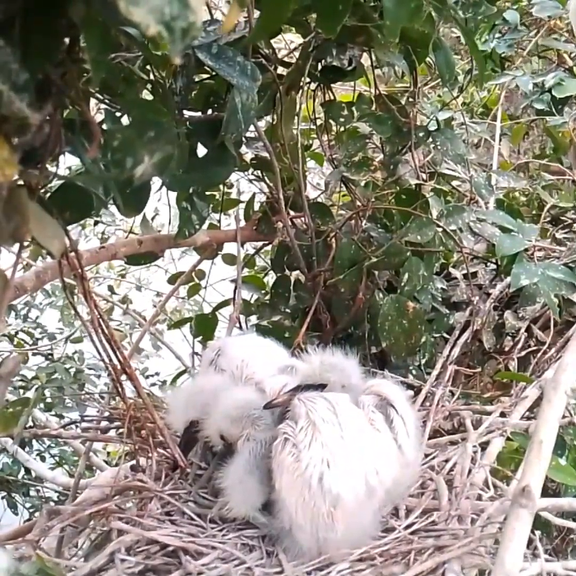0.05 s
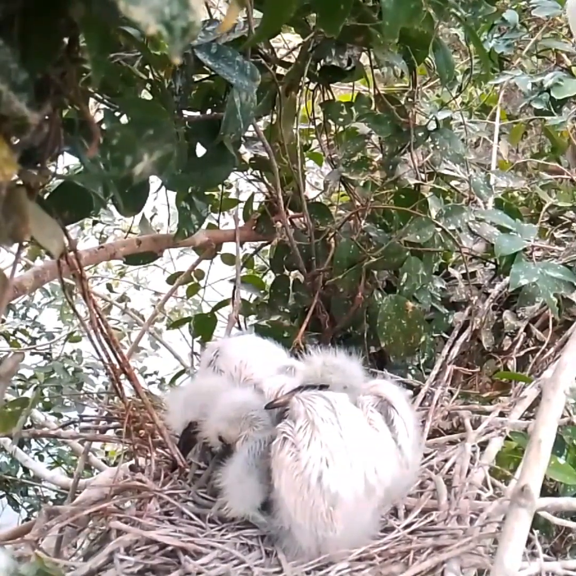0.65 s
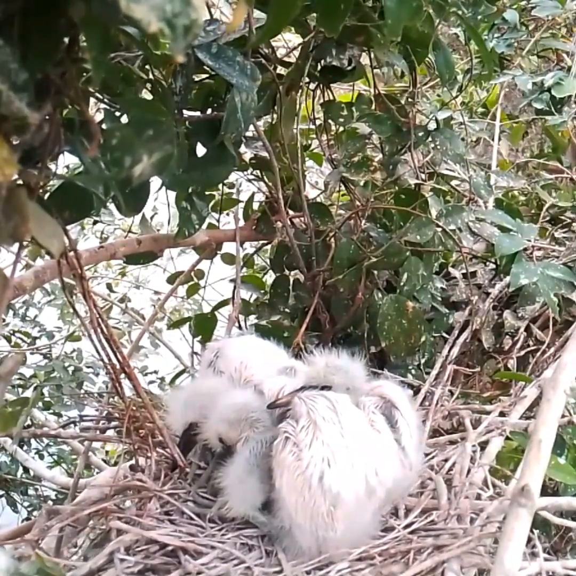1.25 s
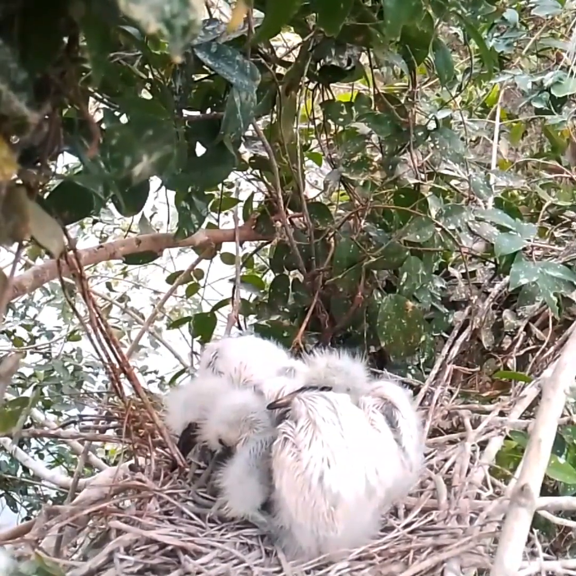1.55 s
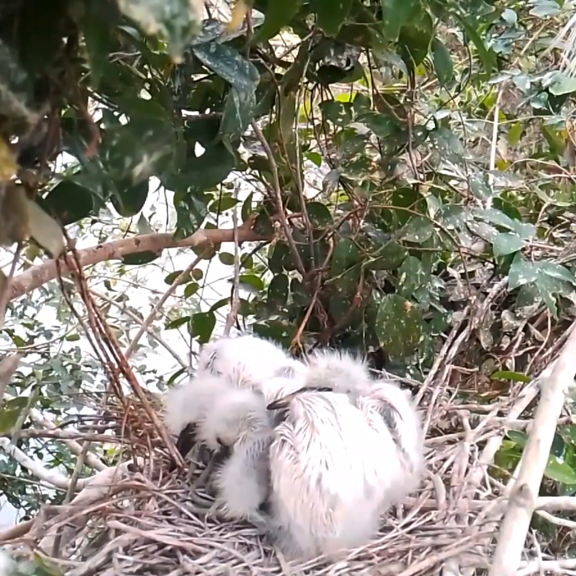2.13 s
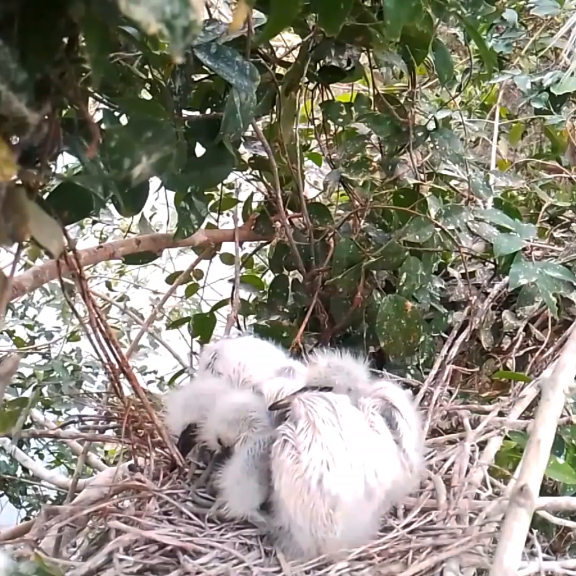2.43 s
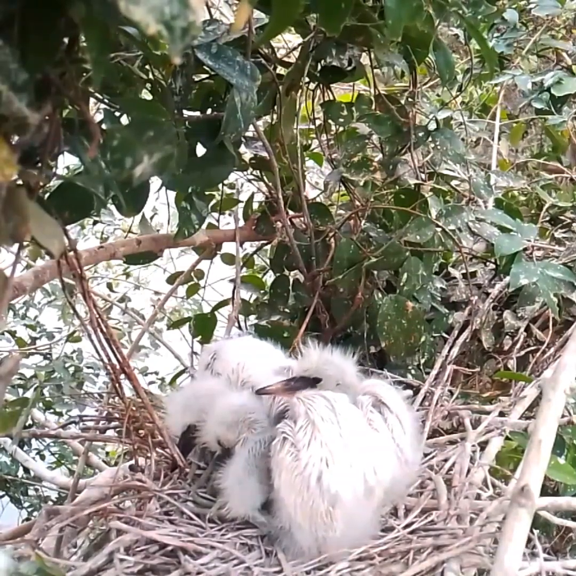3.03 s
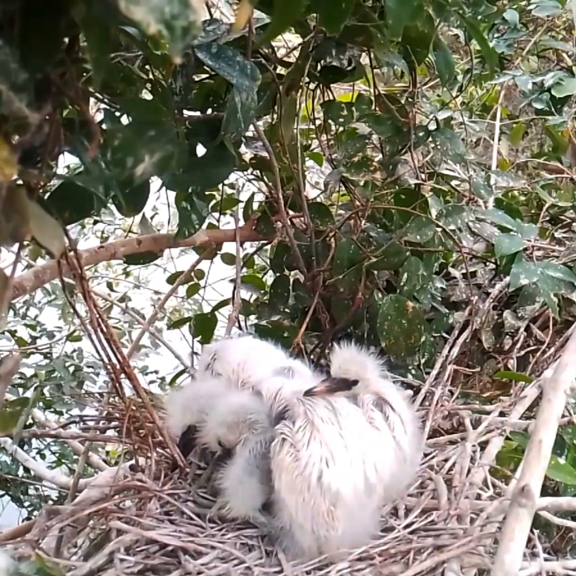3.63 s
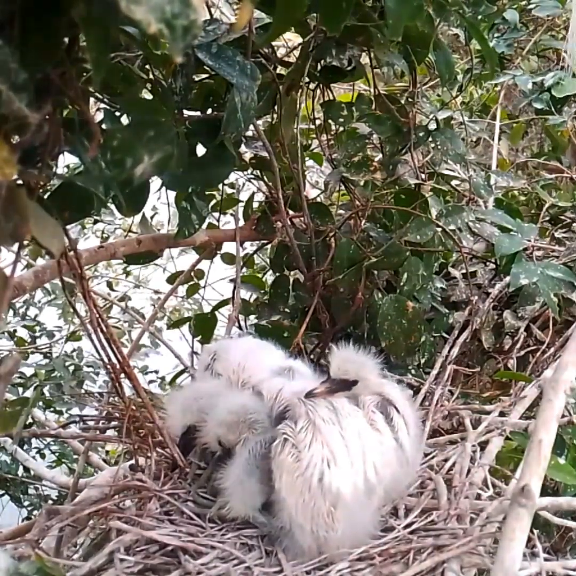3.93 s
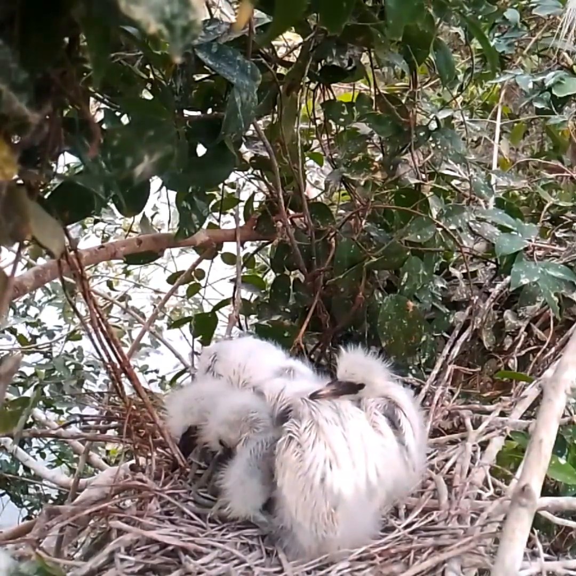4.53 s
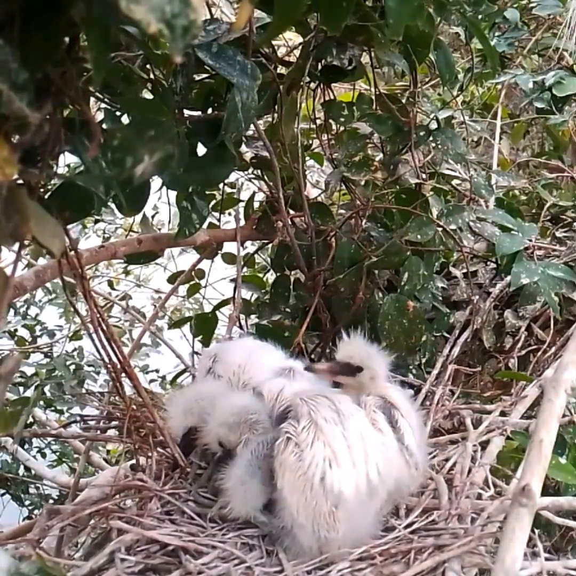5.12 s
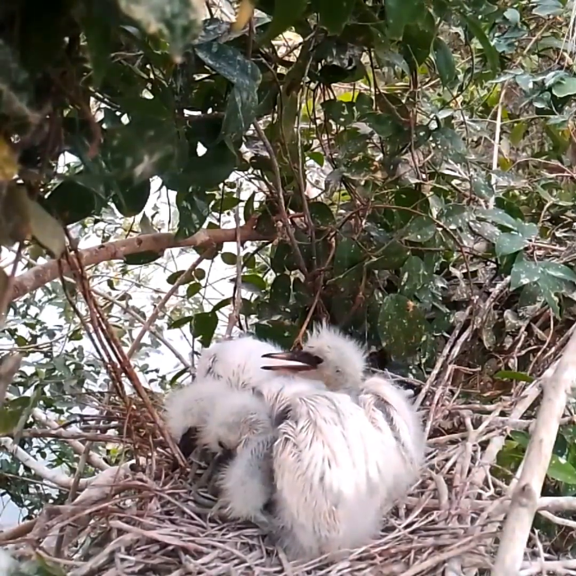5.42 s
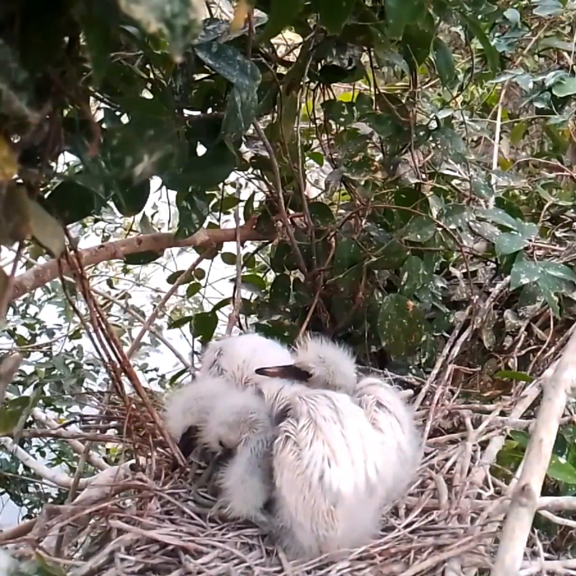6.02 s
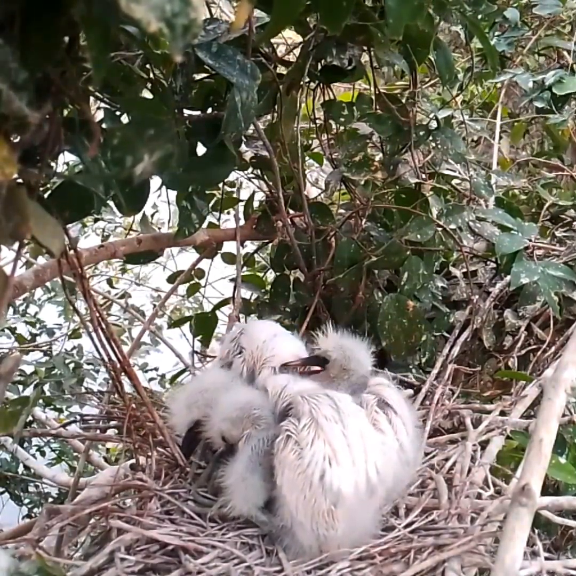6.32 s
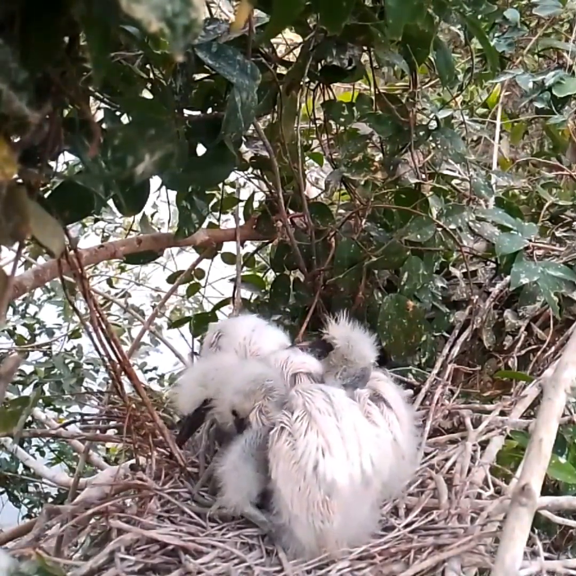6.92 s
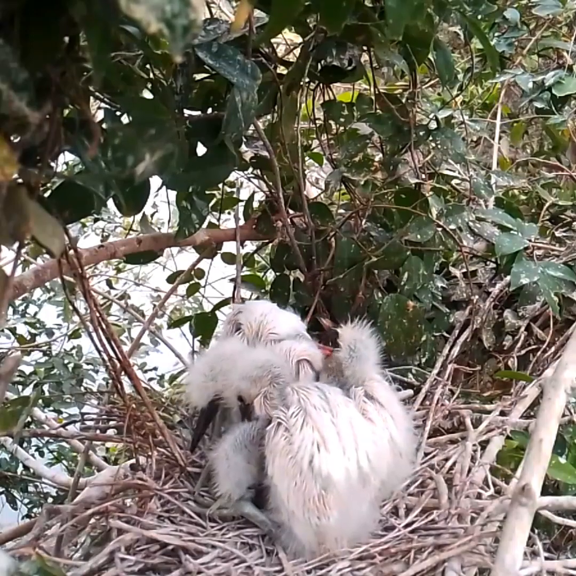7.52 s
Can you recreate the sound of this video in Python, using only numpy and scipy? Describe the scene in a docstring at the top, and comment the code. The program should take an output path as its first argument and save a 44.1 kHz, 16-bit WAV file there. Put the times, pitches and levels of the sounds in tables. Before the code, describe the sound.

Young birds chatter in dry clicks, then beg with hoarse, hissy rasps and wheezes over the faint sizzle of a distant bird colony.

```python
"""Egret chicks call from a stick nest, deep in the leaves of a breeding colony.
They chatter in dry, hissy "keks", then one begs in hoarse rasps, a little over two a second, among
squawks and wheezes. Loose skin in the voice box chops the breath into puffs, which ring in the throat.
Neighbours croak, squeal and peep over the steady sizzle of far nests and a faint rumble of open air.
The leaves scatter every sound, and two small microphone openings colour the treble differently."""
import sys
import numpy as np
from scipy import signal
from scipy.fft import rfft, irfft, next_fast_len
from scipy.io import wavfile
from scipy.ndimage import uniform_filter1d

SR = 44100
rng = np.random.default_rng(int(sys.argv[2]) if len(sys.argv) > 2 else 0)


def unload_audio(sound):
    """Save the sound as a 16-bit wav file, at the path given as the first command line argument."""
    columns = np.transpose(np.atleast_2d(sound))
    # keep every value between -1 and 1, then stretch to whole-number steps
    steps = np.round(np.clip(columns, -1, 1) * 32767)
    wavfile.write(sys.argv[1], SR, steps.astype(np.int16))


N = 342216
TIME = np.arange(N) / SR
CALL_SIZE = 3 * 2 ** 13   # samples set aside to shape one call
CALL_HZ = np.fft.rfftfreq(CALL_SIZE, 1 / SR)
NEST_LAG_MS, COLONY_LAG_MS = 0.32, 0.498   # the left side hears this much later
CUTOFF_HZ = 15800

# how busy the colony is over time: time_s, level_db
COLONY_BUSTLE = [(0, -62), (.1, -68.5), (.16, -67.5), (.23, -64), (.32, -63), (.46, -67), (.52, -65),
                 (.62, -65), (.95, -61.5), (1.06, -64.5), (1.17, -62), (1.25, -65), (1.35, -63),
                 (1.53, -64), (1.94, -64.5), (2.53, -60), (2.79, -61.5), (3.41, -61), (3.95, -69),
                 (4.06, -73.5), (4.52, -57.5), (4.84, -58), (5.81, -61.5), (6.09, -64), (6.33, -69.5),
                 (6.45, -62.5), (7.05, -65), (7.22, -58), (7.76, -51)]
# tone colour of the hiss in rasps and twig ticks: pitch_hz, level_db
FULL_HISS = [(100, -56), (400, -20), (900, -21.5), (1550, -15), (2400, -4.5), (3500, -1.5), (5000, -5.5),
             (8000, 2.5), (11000, 3), (15000, -11)]
# tone colour of the thinner hiss in squawks and wheezes: pitch_hz, level_db
BEGGING_HISS = [(400, -25), (1200, -19.5), (2200, -17), (2900, -7.5), (3600, -5.5), (5000, -4.5),
                (6200, -2.5), (8000, 2), (11000, 2), (15000, -16.5)]


def from_db(db):
    """Turn decibels into a gain, the number a sound is multiplied by."""
    return 10 ** (np.asarray(db) / 20)


def rms_one(x):
    """Scale to an average power of one."""
    return x / np.sqrt(np.mean(x ** 2) + 1e-20)


def at_hz(points, hz):
    """Read the gain at any pitch from a table of pitch_hz, level_db."""
    pitches, db = np.transpose(points)
    return from_db(np.interp(np.log(hz + 1), np.log(pitches), db))


def colour(x, points):
    """Make each pitch louder or softer by a table of pitch_hz, level_db."""
    size = next_fast_len(N + 4096)
    return irfft(rfft(x, size) * at_hz(points, np.fft.rfftfreq(size, 1 / SR)), size)[..., :N]


def drift(rate):
    """A smooth random wobble of typical size one, turning about `rate` times a second."""
    step, warm_up = 40, 2000
    keep = np.exp(-2 * np.pi * step * rate / SR)
    noise = rng.standard_normal(N // step + warm_up + 2)
    slow = signal.lfilter([1], [1, -2 * keep, keep * keep], noise)[warm_up:]
    return np.interp(np.arange(N) / step, np.arange(len(slow)), rms_one(slow))


def voice_box(flap_hz, jitter, rough_db):
    """Loose skin flaps unevenly, letting out puffs of hiss; the rows go ahead, left and right."""
    flaps = np.cumsum(flap_hz * np.exp(jitter * drift(60))) / SR
    puffs = from_db(rough_db * (drift(50) - 2 * (flaps % 1)))
    return rms_one(puffs * rng.standard_normal((3, N)))


def wavering_tone(hz, waver):
    """Tight skin in the voice box sings one unsteady tone, sent alike ahead, left and right."""
    cycles = np.cumsum(hz * (1 + waver * drift(66))) / SR
    return np.broadcast_to(rms_one(np.sin(2 * np.pi * cycles)), (3, N))


def resonance(centre_hz, width_hz):
    """A hollow space rings: the gain is one at its own pitch and falls away on both sides."""
    return 1 / (1 + (2 * (CALL_HZ - centre_hz) / width_hz) ** 2)


def mouth_shape(ripple_db=3, spacing_hz=420):
    """No two calls have the same mouth shape, so each hiss gets its own random peaks and dips."""
    pitches = np.arange(0, SR / 2, spacing_hz)
    return from_db(ripple_db * np.interp(CALL_HZ, pitches, rng.standard_normal(len(pitches))))


def throat_and_bill(peak_s, throat, hiss_colour, hiss_db, voice_db, left_db, bill_width_hz, treble_db):
    """Gain at each pitch for a near chick: its throat rings and its open bill shapes a hiss."""
    # the pitch the bill boosts, which moves with how far it opens: time_s, pitch_hz
    bill_pitches = [(0, 5360), (1.7, 6900), (2.4, 5030), (5.05, 5630), (5.2, 11600), (5.37, 12400),
                    (5.45, 5370), (5.8, 8160), (6.3, 7050), (6.6, 5200), (6.75, 8100), (7.0, 4410)]
    bill_hz = np.interp(peak_s, *np.transpose(bill_pitches))
    hiss = mouth_shape() * at_hz(hiss_colour, CALL_HZ) * (CALL_HZ < CUTOFF_HZ)
    hiss = from_db(hiss_db) * rms_one(hiss * (1 + resonance(bill_hz, bill_width_hz)))
    hiss *= from_db(treble_db / (1 + (9650 / (CALL_HZ + 1)) ** 10))   # only the highest treble
    voice = [from_db(voice_db + db) * rms_one(resonance(hz, width)) for hz, width, db in throat]
    no_bass = 1 / np.hypot(1, (300 / (CALL_HZ + 1)) ** 3)   # a small bird cannot send out low notes
    facing = from_db([[0], [left_db / 2], [-left_db / 2]])   # left_db is left minus right
    return facing * no_bass * np.linalg.norm(voice + [hiss], axis=0)


def add_call(out, source, peak_s, rise_s, fade_s, gain, glide=0, sag=0):
    """Add a call that swells and fades; its pitch slides (glide, octaves a second) and sags when weak."""
    start = max(0, int(peak_s * SR) - CALL_SIZE // 2)
    shaped = irfft(rfft(source[:, start:start + CALL_SIZE], CALL_SIZE) * gain, CALL_SIZE)
    t = TIME[start:start + CALL_SIZE] - peak_s
    t = t[(t > -3 * rise_s) & (t < 3 * fade_s)]
    first = int(round((peak_s + t[0]) * SR))
    swell = np.exp(-(t / np.where(t < 0, rise_s, fade_s)) ** 2)
    # reading the sound faster raises its pitch; sag is in octaves
    speed = 2 ** (np.clip(glide * t, -1, 1) - sag * (1 - swell))
    place = np.cumsum(speed)
    place += (peak_s * SR - start) - np.interp(0, t, place)
    bent = np.array([np.interp(place, np.arange(CALL_SIZE), row) for row in shaped])
    out[:, first:first + len(t)] += swell * bent


def distant_calls(table, source, rise_share, width_hz, sag):
    """From further off, only the strongest ring of the throat carries."""
    out = np.zeros((3, N))
    for peak_s, length_s, throat_hz, glide, level_db in table:
        gain = from_db(level_db) * rms_one(resonance(throat_hz, width_hz))
        add_call(out, source, peak_s, rise_share * length_s, (1 - rise_share) * length_s, gain, glide, sag)
    return out


def foliage(x, lag_ms, leaves_s, grove_s, grove_db):
    """Sound sent ahead arrives straight; sound sent sideways echoes off near leaves and the grove."""
    # sound scattered by leaves, compared with straight sound: pitch_hz, level_db
    leaf_scatter = [(300, -7), (1300, -2.5), (2300, 10), (4000, 0.5), (6000, 13.5), (12000, 30)]
    size = next_fast_len(N + SR)
    hz, t = np.fft.rfftfreq(size, 1 / SR), TIME[:SR // 2]

    def echoes(fade_s):
        """Dense echoes, different on each side, that fall 60 dB in fade_s."""
        spray = rng.standard_normal((2, len(t))) * from_db(-60 * t / fade_s)
        response = rfft(spray, size)
        return response / np.sqrt(uniform_filter1d(np.abs(response) ** 2, size=7000))   # even in colour

    sent = rfft(x, size)
    straight = sent[0] * np.exp(-2j * np.pi * hz * np.array([[lag_ms / 1000], [0]]))
    scatter, tail = at_hz(leaf_scatter, hz), from_db(grove_db)
    early = (straight + scatter * sent[1:] * echoes(leaves_s)) / np.hypot(1, scatter)
    late = tail * sent[1:] * echoes(grove_s)
    return irfft((early + late) / np.hypot(1, tail), size)[:, :N]


def colony(boost_db, flicker_db):
    """Countless far chicks blend into a flickering sizzle."""
    # tone colour of the blended voices: pitch_hz, level_db
    chatter_colour = [(150, -59), (500, -71), (1000, -19), (1500, -26), (2400, -11), (3000, -3),
                      (3900, 0.5), (5000, -5), (7000, -5.5), (10000, -6), (15000, -3.5)]
    level_db = boost_db + np.interp(TIME, *np.transpose(COLONY_BUSTLE)) + flicker_db * drift(0.44)
    voices = voice_box(flap_hz=161, jitter=0.85, rough_db=3)
    sizzle = rms_one(colour(voices, chatter_colour)) * from_db(level_db)
    return foliage(sizzle, COLONY_LAG_MS, leaves_s=0.17, grove_s=0.14, grove_db=-33)


def air(level_db):
    """The open air rumbles, faint and low."""
    # tone colour of the rumble: pitch_hz, level_db
    rumble_colour = [(25, -39), (40, 3.5), (70, 2), (120, -6.5), (160, -18), (230, -0.5), (300, 6),
                     (420, 0), (700, -1.5), (1200, -4.5), (2000, -6), (5000, -35)]
    rumble = from_db(level_db) * rms_one(colour(rng.standard_normal((3, N)), rumble_colour))
    return foliage(rumble, NEST_LAG_MS, leaves_s=0.031, grove_s=0.48, grove_db=-10.5)


def keks(rise_share=0.296):
    """Dry chatter: each note snaps open and dies away, with a rising cluck tone inside it."""
    # chatter notes: peak_s, length_s, throat_hz, hiss_db, treble_db, voice_db, left_db
    notes = [(0.142, 0.041, 2090, -50.5, 6, -78, -0.5), (0.292, 0.032, 2270, -53, 0.5, -88, -6),
             (0.401, 0.027, 1660, -52, 6.5, -79, 0), (0.471, 0.024, 2110, -53.5, 2, -94, 0),
             (0.555, 0.028, 2280, -47, -4, -82, -1.5), (0.6, 0.035, 1790, -58.5, 7, -71, 8),
             (0.679, 0.034, 2240, -49, -3, -79, -2), (0.787, 0.042, 1930, -59, 1.5, -65.5, 1),
             (0.843, 0.034, 1870, -51.5, -1.5, -85, -3), (0.888, 0.022, 2200, -46, -8, -88, -4.5),
             (0.955, 0.037, 1900, -55.5, 5, -69.5, 7), (1.107, 0.055, 1780, -46.5, 3, -68, 1),
             (1.146, 0.064, 1930, -43.5, -2.5, -65.5, -1.5), (1.275, 0.017, 2240, -53, -2, -73, -9),
             (1.308, 0.034, 1960, -53, -5, -67.5, 3), (1.365, 0.031, 1980, -47, 7.5, -80, 3.5),
             (1.452, 0.025, 2250, -51, -6, -84, -2), (1.629, 0.034, 2260, -45.5, 4.5, -86, 1),
             (1.834, 0.043, 1690, -57, -5, -73, 2), (1.888, 0.071, 1960, -46.5, 1.5, -78, -2),
             (2.027, 0.034, 1950, -48, -4, -65, 6), (2.116, 0.017, 2240, -48, 9, -84, 0.5),
             (2.153, 0.038, 2150, -45.5, 1.5, -70, 0.5), (2.201, 0.041, 1960, -48.5, -2, -64.5, 3),
             (2.367, 0.045, 1910, -48, -1, -63.5, -2), (2.401, 0.052, 1880, -50, 3, -72, -2),
             (2.553, 0.043, 1970, -43, -1.5, -57.5, -2), (2.588, 0.031, 2060, -48, -2, -62.5, -9),
             (2.639, 0.027, 2410, -49.5, -10, -64.5, -9), (2.835, 0.027, 2030, -62.5, 13, -75, -14),
             (2.89, 0.025, 2000, -63, 0, -80, -8), (2.997, 0.012, 1770, -56.5, 7, -63.5, 4),
             (3.099, 0.031, 2280, -49, 9, -69.5, -2), (3.175, 0.039, 1880, -49.5, 1, -65.5, 4),
             (3.294, 0.073, 2240, -54, 8, -69.5, 4.5), (3.36, 0.051, 1810, -50.5, 7, -67, 1),
             (3.552, 0.068, 1850, -53.5, 3, -70.5, -2), (3.642, 0.03, 2000, -56, 9.5, -79, -4),
             (3.732, 0.065, 2030, -58, 0, -80, 0), (3.837, 0.062, 2320, -53.5, -1, -73, -3)]
    # where the throat rings: times_throat_pitch, width_hz, above_voice_db
    rings = [(.34, 131, -10.5), (.69, 130, -7.5), (1, 160, 1), (1.55, 240, 0.5), (1.82, 400, -1)]
    out, source = np.zeros((3, N)), voice_box(flap_hz=152, jitter=0.42, rough_db=2.5)
    cluck = wavering_tone(hz=1854, waver=0.0283)
    for peak_s, length_s, throat_hz, hiss_db, treble_db, voice_db, left_db in notes:
        throat = [(times * throat_hz, width, db) for times, width, db in rings]
        gain = throat_and_bill(peak_s, throat, kek_colour(), hiss_db, voice_db, left_db,
                               bill_width_hz=7500, treble_db=treble_db)
        add_call(out, source, peak_s, rise_share * length_s, (1 - rise_share) * length_s, gain, sag=0.073)
        add_call(out, cluck, peak_s, rise_s=0.017, fade_s=0.0082, gain=from_db(voice_db - 2.5),
                 glide=5, sag=0.083)
    return out


def kek_colour():
    """Tone colour of the hiss in a kek."""
    # pitch_hz, level_db
    hiss_colour = [(100, -56), (400, -23), (900, -22), (1500, -13), (2400, -5.5), (3100, -6.5), (5000, -5),
                   (8000, 3), (11000, 1.5), (15000, 2.5)]
    return hiss_colour


def peeps():
    """One neighbour peeps brief, nearly pure notes on a single pitch."""
    # peeps: peak_s, level_db
    notes = [(.15, -60), (2.725, -62), (4.66, -55.5), (4.855, -54.5), (5.045, -53), (5.11, -54.5),
             (5.25, -59), (5.44, -58), (5.525, -52), (5.668, -58), (5.965, -58), (6.99, -61)]
    out, source = np.zeros((3, N)), wavering_tone(hz=2857, waver=0.016)
    for peak_s, level_db in notes:
        add_call(out, source, peak_s, rise_s=0.016, fade_s=0.0081, gain=from_db(level_db))
    return out


def squeals(faint_per_s=9, faint_length_s=0.038, faint_hz=3735):
    """Breath rings thinly in throats at other nests; faint, random squeals follow the colony's level."""
    # the clearer squeals: peak_s, length_s, throat_hz, glide_octaves_per_s, level_db
    clear = [(.62, 0.092, 3600, 0.0053, -57.5), (1.58, 0.065, 3940, 0.83, -60),
             (2.61, 0.11, 3800, -0.051, -54), (3.19, 0.076, 3500, 0.36, -55.5),
             (4.27, 0.12, 4900, 0.023, -62.5), (4.352, 0.059, 3550, -0.76, -53.5),
             (4.75, 0.13, 3730, 0.24, -56), (5.125, 0.06, 4640, -0.06, -58),
             (5.497, 0.076, 3730, -0.45, -46.5), (5.903, 0.02, 3550, 0.12, -48),
             (6.362, 0.046, 3630, 0.018, -61.5), (7.2, 0.077, 3390, 0.71, -45.5),
             (7.38, 0.085, 4110, -0.46, -53), (7.66, 0.095, 3800, -0.79, -46)]
    times = TIME[rng.random(N) < faint_per_s / SR]
    pitches, glides = rng.standard_normal((len(times), 2)).T
    levels = np.interp(times, *np.transpose(COLONY_BUSTLE))
    faint = [(peak_s, faint_length_s, faint_hz * np.exp(0.1 * pitch), 1.5 * glide, level_db)
             for peak_s, pitch, glide, level_db in zip(times, pitches, glides, levels)]
    breath = rms_one(rng.standard_normal((3, N)))
    return distant_calls(clear + faint, breath, rise_share=0.55, width_hz=180, sag=0.018)


def yelps():
    """A rough tone slides quickly downward."""
    # yelps: peak_s, pitch_hz, glide_octaves_per_s, level_db
    notes = [(2.567, 1547, -9, -60.5), (2.588, 1003, -11.5, -67), (3.391, 1936, -8.5, -66),
             (3.433, 1320, -11, -65)]
    out = np.zeros((3, N))
    for peak_s, pitch_hz, glide, level_db in notes:
        tone = wavering_tone(pitch_hz, waver=0.11)
        add_call(out, tone, peak_s, rise_s=0.051, fade_s=0.011, gain=from_db(level_db), glide=glide)
    return out


def croaks():
    """Slow, rough flapping in the voice box makes dull croaks further off."""
    # croaks: peak_s, length_s, throat_hz, glide_octaves_per_s, level_db
    notes = [(3.27, 0.11, 1020, 0.5, -59), (3.46, 0.051, 1070, -2.5, -65), (3.62, 0.18, 1130, 1, -65.5),
             (4.095, 0.2, 906, 0, -61.5), (4.105, 0.061, 1580, 4.5, -67), (4.31, 0.031, 1040, 2, -60),
             (4.41, 0.13, 1040, 2.5, -56.5), (4.79, 0.14, 1050, 1.5, -67), (5.06, 0.098, 1170, -2.5, -62.5),
             (5.22, 0.166, 1090, -0.5, -63), (5.69, 0.13, 1050, -1.5, -66.5),
             (6.55, 0.21, 1030, 2.5, -62.5), (7.02, 0.15, 1050, 0.5, -61), (7.55, 0.023, 1350, 6, -80)]
    source = voice_box(flap_hz=83, jitter=0.46, rough_db=4)
    return distant_calls(notes, source, rise_share=0.49, width_hz=380, sag=0.079)


def squawks(groan_s=0.026):
    """A soft, low groan comes before the bill opens, then turns into a harsh cry."""
    # squawks: peak_s, rise_s, fade_s, hiss_db, voice_db, left_db, groan_lead_s, groan_db
    notes = [(4.079, 0.017, 0.063, -47.5, -65, -2, 0.015, -67),
             (4.469, 0.049, 0.031, -53, -57, 2, 0.031, -52),
             (6.551, 0.047, 0.016, -43.5, -53.5, -4, 0.032, -51),
             (7.056, 0.0077, 0.075, -43, -55.5, 1, 0.0164, -55),
             (7.556, 0.064, 0.019, -38, -52, -1, 0.056, -48.5)]
    # where the throat rings: pitch_hz, width_hz, above_voice_db
    rings = [(1300, 150, -11.5), (2135, 320, 3.5), (2590, 220, 1), (2960, 300, 3.5), (3610, 510, -2),
             (4520, 540, -7.5), (4950, 970, -1.5)]
    out, source = np.zeros((3, N)), voice_box(flap_hz=197, jitter=0.16, rough_db=0.4)
    groan = rms_one(resonance(2170, width_hz=180))
    open_mouth = 1 - 0.9 * resonance(1480, width_hz=280)   # swallows one narrow band of the cry
    for peak_s, rise_s, fade_s, hiss_db, voice_db, left_db, lead_s, groan_db in notes:
        add_call(out, source, peak_s - lead_s, groan_s, groan_s, from_db(groan_db) * groan,
                 glide=2.96, sag=0.046)
        gain = throat_and_bill(peak_s, rings, BEGGING_HISS, hiss_db, voice_db, left_db,
                               bill_width_hz=2200, treble_db=-1)
        add_call(out, source, peak_s, rise_s, fade_s, open_mouth * gain, glide=0.4, sag=0.0402)
    return out


def wheezes(rise_share=0.514, ring_width_hz=150):
    """Long begging hisses, nearly all breath, fill the gaps between the rasps."""
    # wheezes: peak_s, length_s, throat_hz, voice_db, ring_hz, ring_db, hiss_db, treble_db, left_db
    notes = [(4.173, 0.11, 2970, -76, 4180, -65, -53, -3, -3.5),
             (4.356, 0.052, 3100, -65, 3300, -57, -53, 2, -1),
             (4.629, 0.13, 2950, -61.5, 3600, -62.5, -48, 8, 0.5),
             (4.769, 0.097, 2970, -70, 3600, -55.5, -47.5, 6, 1),
             (5.046, 0.099, 2800, -74, 3760, -55, -43.5, 5, 2),
             (5.171, 0.13, 3060, -68, 3700, -62.5, -48, 1.5, 1),
             (5.327, 0.098, 2980, -59, 3770, -53, -44.5, 0, -1),
             (5.43, 0.16, 2910, -52, 3660, -65, -44, 3.5, -1.5),
             (5.572, 0.066, 3070, -61, 3750, -62.0, -42.5, -1, -0.5),
             (5.648, 0.14, 2840, -68, 3600, -64, -50.5, 5, 2),
             (5.836, 0.129, 2720, -57, 3590, -62, -41.5, -5.5, 1),
             (6.08, 0.054, 2720, -57.5, 3760, -59, -42, 0, 0),
             (6.151, 0.09, 2680, -61.5, 3830, -58, -42.5, -4.5, 2.5),
             (6.292, 0.098, 2720, -59.5, 3600, -57.5, -46.5, -2.5, 4.5),
             (6.629, 0.17, 2900, -63.5, 3700, -71, -45, -0.5, -1),
             (6.792, 0.049, 2950, -61, 3730, -54.5, -44, 3.5, -0.5),
             (6.996, 0.11, 2880, -67, 3780, -63, -57.5, -2, 15.5),
             (7.324, 0.051, 2530, -58, 3490, -58, -40, -1, 3),
             (7.38, 0.1, 3010, -65, 3710, -57.5, -46, -5, 1),
             (7.641, 0.22, 2890, -74, 3640, -54, -44.5, -1, -1)]
    # where the throat rings: times_throat_pitch, width_hz, above_voice_db
    rings = [(.76, 320, -4.5), (1, 306, 1.5), (1.85, 600, -7.5)]
    out, source = np.zeros((3, N)), voice_box(flap_hz=160, jitter=0.36, rough_db=2)
    for peak_s, length_s, throat_hz, voice_db, ring_hz, ring_db, hiss_db, treble_db, left_db in notes:
        throat = [(times * throat_hz, width, db) for times, width, db in rings]
        throat.append((ring_hz, ring_width_hz, ring_db - voice_db))
        gain = throat_and_bill(peak_s, throat, BEGGING_HISS, hiss_db, voice_db, left_db,
                               bill_width_hz=2700, treble_db=treble_db)
        rise_s = rise_share * length_s
        add_call(out, source, peak_s, rise_s, length_s - rise_s, gain, sag=0.0405)
    return out


def rasps(rise_share=0.531):
    """Hoarse begging from a wide throat, whose low ring lifts as the chick pushes."""
    # rasps: peak_s, length_s, throat_hz, glide_octaves_per_s, chest_db, middle_hz, middle_db, upper_hz,
    # upper_db, hiss_db, voice_db, treble_db, left_db (chest, middle and upper are added to voice_db)
    notes = [(4.487, 0.089, 1235, 0.53, -25, 2120, -11, 3310, -6, -39, -41.5, 2, -2),
             (4.915, 0.11, 1312, -0.66, -22, 1760, -19, 3670, -5.5, -42, -44.5, 6, 0.5),
             (5.376, 0.12, 1323, 0.43, -40, 1710, -15, 3380, -8.5, -39.5, -42, -2.5, 2),
             (5.795, 0.086, 1300, -1.56, -47, 1700, -10, 2500, -11.5, -41.5, -43, -8, 0),
             (6.218, 0.069, 1245, -0.91, -43, 1710, -10, 2640, -8, -40, -44, -7, 3),
             (6.7, 0.15, 1164, 0.5, -20, 1800, -17.5, 2920, -10, -45.5, -49.5, -0.5, 1),
             (7.194, 0.14, 1243, 0.078, -29, 1780, -20, 2450, -20, -40, -44.5, -6.5, 2),
             (7.76, 0.075, 1320, 0.92, -27, 2640, -11, 3320, -5, -43.5, -47, -6, 1)]
    # throat rings that move together: times_throat_pitch, width_hz, above_voice_db
    rings = [(1, 180, -2.5), (1.12, 171, -14.5), (2.85, 450, -20), (4.25, 550, -15.5)]
    out, source = np.zeros((3, N)), voice_box(flap_hz=196.5, jitter=0.13, rough_db=1.07)
    for (peak_s, length_s, throat_hz, glide, chest_db, middle_hz, middle_db, upper_hz, upper_db,
         hiss_db, voice_db, treble_db, left_db) in notes:
        throat = [(times * throat_hz, width, db) for times, width, db in rings]
        # three more rings: pitch_hz, width_hz, above_voice_db
        throat += [(593, 160, chest_db), (middle_hz, 290, middle_db), (upper_hz, 460, upper_db)]
        gain = throat_and_bill(peak_s, throat, FULL_HISS, hiss_db, voice_db, left_db,
                               bill_width_hz=670, treble_db=treble_db)
        rise_s = rise_share * length_s
        add_call(out, source, peak_s, rise_s, length_s - rise_s, gain, glide, sag=0.0612)
    return out


def whistle(pitch_hz=4223, rise_hz_per_s=410, rough_db=1):
    """A neighbour holds one thin, wavering note that rises slowly and nearly fails in the middle."""
    # loudness of the note: time_s, level_db
    loudness = [(5.905, -70), (5.925, -55), (5.98, -60), (6.03, -68), (6.12, -53), (6.19, -59), (6.22, -70)]
    times, levels = np.transpose(loudness)
    level = from_db(np.interp(TIME, times, levels) + rough_db * drift(35))
    sounding = (TIME > times[0]) & (TIME < times[-1])
    return level * sounding * wavering_tone(pitch_hz + rise_hz_per_s * (TIME - times[0]), waver=0.012)


def twigs(fade_s, right_db):
    """Twigs on the left of the nest tick, dry and bright, as a chick shifts its feet."""
    # ticks: start_s, level_db
    ticks = [(6.849, -43.5), (6.9, -47)]
    dying = sum(from_db(level_db - 60 * np.abs(TIME - start_s) / fade_s) * (TIME >= start_s)
                for start_s, level_db in ticks)
    hiss = rms_one(colour(rng.standard_normal((3, N)), FULL_HISS))
    return dying * hiss * from_db([[right_db], [0], [right_db]])


def scene():
    """The near nest, its neighbours, the far colony and the air, all heard through leaves."""
    # peaks and dips from a begging chick's stretched windpipe: pitch_hz, level_db
    windpipe = [(1250, -0.5), (1540, -2), (1750, 1.5), (2120, 0.5), (2400, 0.5), (2920, 0), (3180, -5),
                (3580, 2.5), (4030, -1), (4350, 1), (4850, -2), (5350, 1.5), (5850, 0), (6300, -3),
                (6750, 1), (7400, -1), (7950, 1.5), (8700, -3.5), (10500, 1), (13000, 0)]
    nest = keks() + yelps() + colour(wheezes() + rasps() + squawks(), windpipe)
    nest += twigs(fade_s=0.15, right_db=-14)
    nest = foliage(nest, NEST_LAG_MS, leaves_s=0.049, grove_s=0.32, grove_db=-11)
    neighbours = croaks() + squeals() + peeps() + whistle()
    neighbours = foliage(neighbours, COLONY_LAG_MS, leaves_s=0.045, grove_s=0.17, grove_db=-1)
    return nest + neighbours + colony(boost_db=7, flicker_db=1.9) + air(level_db=-74)


def record(dry):
    """Each microphone opening rings at its own treble pitch; the very top is cut off."""
    # tone colour of the left and right openings: pitch_hz, level_db
    left_opening = [(2500, 1.5), (3700, 2), (5000, 2.5), (6200, 3), (6900, 8), (7500, 11), (8200, 1),
                    (9000, -3.5), (10000, -14), (12500, -15.5)]
    right_opening = [(2500, 1.5), (3700, 0), (5500, 1), (7500, -6.5), (9000, -3), (10300, 5.5),
                     (11000, 3.5), (12000, -3), (13500, -14.5)]
    both = np.array([colour(dry[0], left_opening), colour(dry[1], right_opening)])
    return signal.sosfilt(signal.ellip(10, .1, 80, CUTOFF_HZ, fs=SR, output="sos"), both)


dry = scene()
out = record(dry)
unload_audio(out)
```